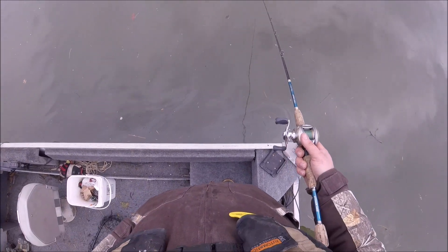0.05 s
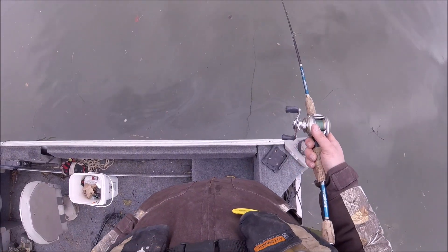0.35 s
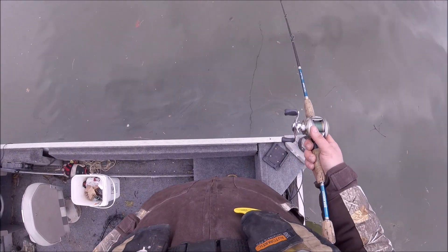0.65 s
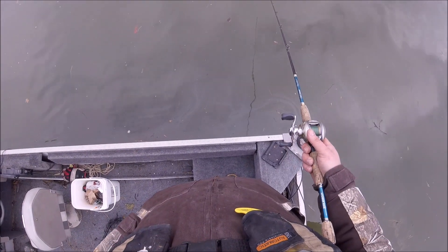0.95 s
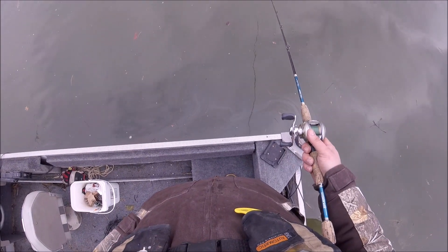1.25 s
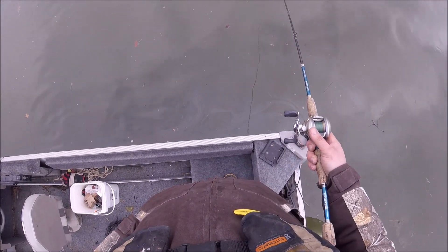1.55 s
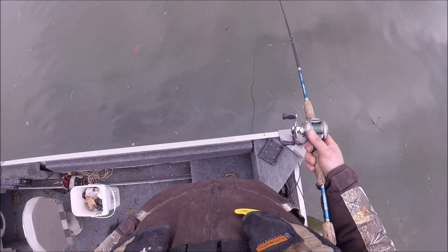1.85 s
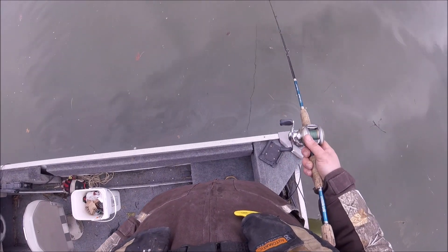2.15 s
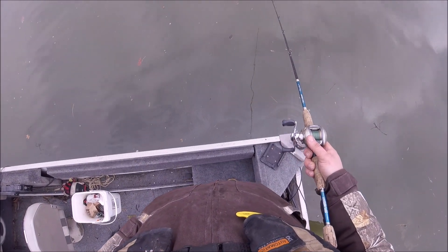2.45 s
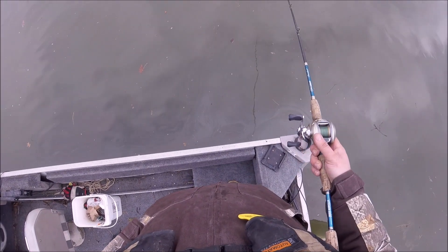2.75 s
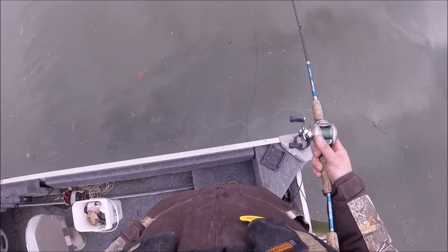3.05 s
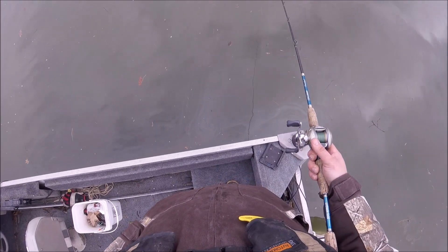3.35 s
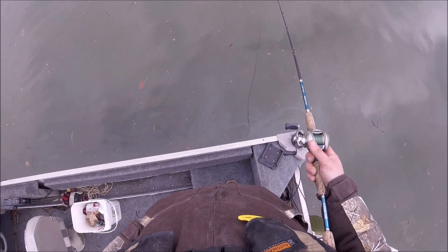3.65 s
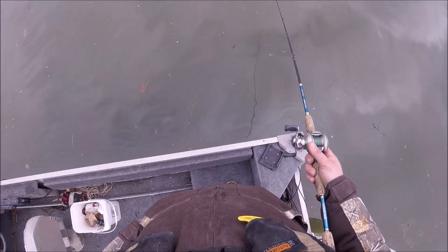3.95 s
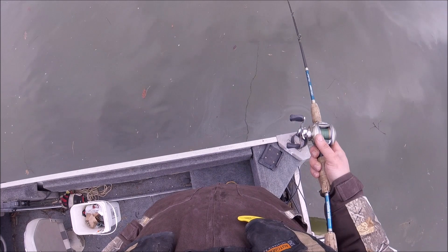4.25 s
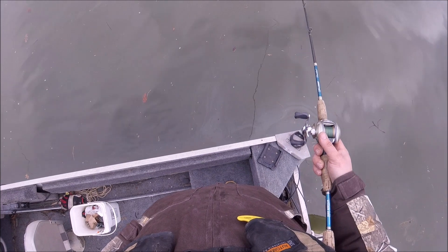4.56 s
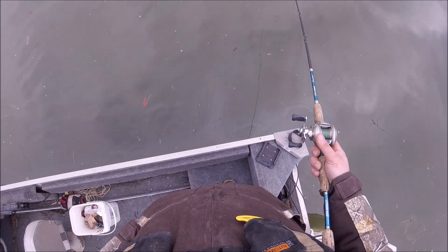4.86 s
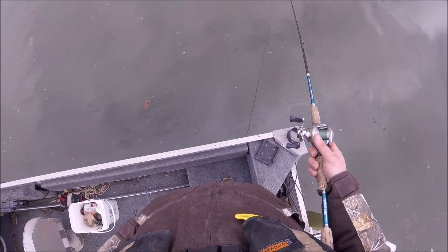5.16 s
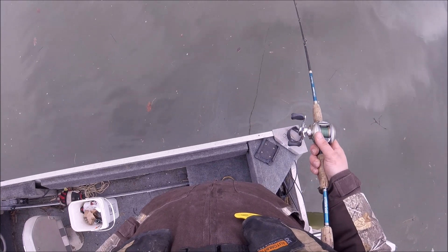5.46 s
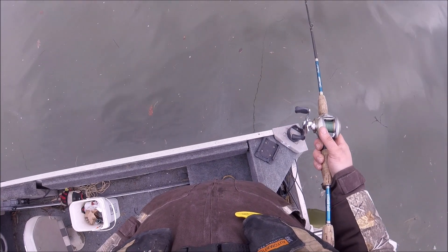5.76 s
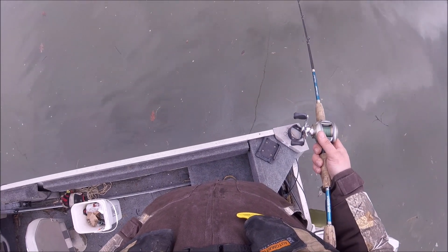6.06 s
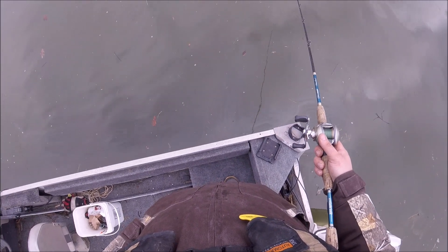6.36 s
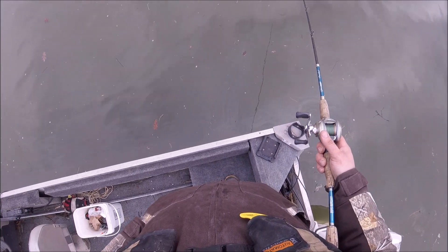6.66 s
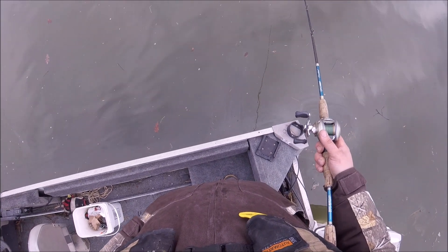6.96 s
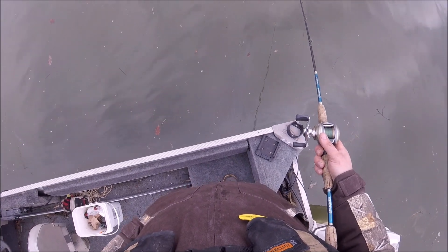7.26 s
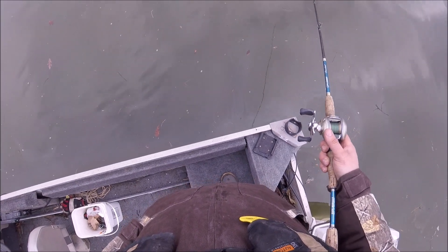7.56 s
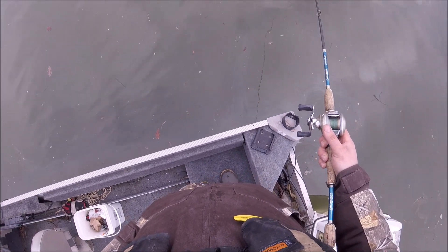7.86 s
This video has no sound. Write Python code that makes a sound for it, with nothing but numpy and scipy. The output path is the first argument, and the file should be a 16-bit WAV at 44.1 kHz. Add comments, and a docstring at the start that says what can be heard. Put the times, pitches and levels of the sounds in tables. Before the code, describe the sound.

An electric trolling motor hums with a soft throb while water washes faintly along a small metal boat.

```python
"""An electric trolling motor pushes a small aluminium boat along a calm river, heard from chest height.
All along, the hull hums on multiples of the shaft speed, which beat into a soft throb, while the
propeller churns and water washes along the side. At first a sleeve rustles and a breeze dies away.
After about a second a faint whine sings out, the fishing reel ticks and a hand scuffs the rod.
The hum swells near 3 seconds, a far bird calls near 4, and the sleeve rustles most at the end."""
import sys
import numpy as np
from scipy import signal
from scipy.fft import rfft, irfft, next_fast_len
from scipy.io import wavfile

SR = 44100
rng = np.random.default_rng(int(sys.argv[2]) if len(sys.argv) > 2 else 0)


def digitize_waveform(pressure):
    """Quantize a signal to 16-bit integers and store it at the path in sys.argv[1].

    Rows of a 2-D input are taken as channels; values are limited to [-1, 1].
    """
    field = np.atleast_2d(pressure).T
    bounded = np.clip(field, -1, 1)
    quanta = np.round(bounded * 32767).astype(np.int16)
    wavfile.write(sys.argv[1], SR, quanta)


N = 353064
TIME = np.arange(N) / SR

# The microphone's hiss. Each row: frequency in Hz, relative level in dB.
HISS_SPECTRUM = [(30, -2), (2500, -1), (3600, -6), (4350, -18), (5100, -5.5), (5900, -5.5), (6500, 4),
                 (8300, 3), (10000, 0), (11500, -6), (13000, -7), (15200, -13)]
# Air blowing on the microphone. Each row: frequency in Hz, relative level in dB.
BREEZE_SPECTRUM = [(10, 1), (25, -2), (52, -2), (70, 0), (95, -4), (130, 6), (300, -47)]
# Gusts of the breeze. Each row: time of the peak in seconds, length in seconds, level in dB.
GUSTS = [(.08, .3, -52), (.69, 0.17, -62), (1.36, .18, -57), (1.72, .17, -55), (2.32, .2, -64)]
# The bird's notes. Each row: start and length in seconds, first and last pitch in Hz, level in dB.
BIRD_NOTES = [(3.930, .065, 5520, 4950, -73), (3.968, .045, 5650, 4850, -75), (3.990, .06, 5650, 4900, -74)]
# Sleeve cloth. Each row: frequency in Hz, relative level in dB.
CLOTH_SPECTRUM = [(900, -15), (2200, 6.5), (3300, 2), (4300, -5), (5100, 2), (5800, -5), (6600, -4),
                  (9000, -15), (15000, -19)]
# Rubs of the sleeve. Each row: time of the peak in seconds, length in seconds, level in dB.
SLEEVE_RUBS = [(.05, 0.85, -71), (1.33, 0.77, -72.5), (2.45, 1, -78), (4.3, 0.77, -74), (7.55, 1.11, -73),
               (7.8, .75, -66), (7.92, 0.22, -64)]
# Skin on the rod's grip. Each row: frequency in Hz, relative level in dB.
GRIP_SPECTRUM = [(2000, -5), (4200, -7), (5200, 1), (6200, 1), (8500, -5), (10300, 0), (11800, -12),
                 (15000, -20)]
# The hand's scuff. Each row: time of the peak in seconds, length in seconds, level in dB.
HAND_SCUFFS = [(1.36, .036, -62.5)]
# The reel's tick. Each row: start in seconds, level in dB, pitch in Hz, seconds to fade by 60 dB.
REEL_TICKS = [(1.261, -52, 5620, .015)]
# Swells of the whine. Each row: time of the peak in seconds, length in seconds, level in dB.
WHINE_SWELLS = [(.86, 0.7, -55.5), (2.17, 0.15, -52.5)]
# Water along the hull. Each row: frequency in Hz, relative level in dB.
WASH_SPECTRUM = [(250, -15), (480, -5.5), (700, -3), (785, 0), (900, 0), (1020, -2.5), (1150, -3),
                 (1370, -7), (1600, -10.5), (2000, -17), (3000, -28), (4300, -40), (8000, -67)]
# How strong that water is. Each row: time in seconds, relative level in dB.
WASH_LEVELS = [(0, -49.5), (2.1, -49), (2.78, -48.5), (3.15, -50), (3.95, -48.5), (4.8, -50), (5.9, -49.5),
               (7, -50), (8, -49.5)]
# Three broad ringing tones of the metal. Each row: pitch in Hz, width in Hz, resting level in dB.
HULL_RINGS = [(810, 45, -63.5), (999.4, 67, -66.5), (1284, 97, -73)]
# The lowest ring bends in pitch. Each row: time in seconds, shift in Hz.
RING_BEND = [(.9, 0), (1.5, 15), (2.3, -0.5), (2.85, 15), (4.3, -10), (5.1, 58), (5.6, 46.5), (6.3, 0),
             (7.2, 35)]
# Surges of water. Each row: peak time and length in seconds, then low, middle and high ring in dB.
WATER_SURGES = [(.72, 0.4, -57, -67, -68), (1.5, 0.89, -58, -60, -74), (2.8, 0.69, -54.5, -50, -57.5),
                (3.36, 0.48, -70, -53, -75), (4.15, 0.44, -60, -57.5, -69), (5.22, 0.82, -58, -55, -80),
                (5.9, 0.65, -64, -58, -66), (6.4, 1.9, -68, -60.5, -76)]
# The propeller's churn. Each row: frequency in Hz, relative level in dB.
CHURN_SPECTRUM = [(100, -49), (120, -25.5), (143, -2.5), (175, -0.5), (215, -1), (258, -2), (278, -7),
                  (305, -7), (365, -12), (480, -17), (700, -27), (1500, -54)]
# How strong the churn is. Each row: time in seconds, level in dB.
CHURN_LEVELS = [(0, -43.5), (1.7, -44.5), (3, -41.5), (3.55, -46.2), (4.8, -44), (5.5, -44), (6.5, -44),
                (8, -43.5)]
# The motor's speed. Each row: time in seconds, shaft turns per second.
SHAFT_SPEED = [(0, 13.524), (2, 13.485), (8, 13.408)]
# The three tones the hull gives off best, changing as the boat swings.
# Each row: time in seconds, then levels in dB at 13, 15 and 16 times the shaft speed.
HUM_LEVELS = [(0, -37.5, -50, -40.7), (1.05, -37.3, -46, -40.8), (2.0, -37, -47.5, -42),
              (2.55, -36, -47.5, -40), (3.05, -33.5, -42.5, -38), (3.65, -36, -40, -38),
              (4.15, -36, -45.5, -42), (4.65, -39.3, -54, -55), (5.0, -38, -50.5, -45.5),
              (5.35, -36.5, -49.5, -49.5), (5.9, -35.5, -43.5, -53), (6.55, -36, -44.5, -45),
              (7.1, -37.3, -45.5, -45), (8, -36.5, -49, -46)]
# Weaker tones around those three. Each row: multiple of the shaft speed, relative level in dB.
WEAK_TONES = [(7, -77), (8, -74.5), (9, -66), (10, -69), (11, -54), (12, -53.5), (14, -76), (17, -50.5),
              (18, -63.5)]
# Higher, buzzing tones. Each row: multiple of the shaft speed, relative level in dB.
BUZZ_TONES = [(20, -59), (21, -60.5), (22, -61.5), (23, -66.5), (24, -60.5), (25, -64.5), (26, -65),
              (29, -79), (30, -68.5)]
# The buzz swells as the boat swings. Each row: time in seconds, change of level in dB.
BUZZ_SWELL = [(0, 0), (.6, -6), (1.05, 3), (1.9, -5), (2.6, 3), (3.2, 7.5), (3.7, 2), (4.5, -1.5),
              (6, -1.5), (8, 0.5)]


def gain_of(db):
    """Turns decibels into a number to multiply a sound by."""
    return 10 ** (np.asarray(db) / 20)


def evened(x):
    """Scales a signal so that its average power is 1."""
    return x / np.sqrt(np.mean(x ** 2) + 1e-20)


def curve(rows, column=1):
    """Joins the values in one column of a table with straight lines over time."""
    columns = np.transpose(rows)
    return np.interp(TIME, columns[0], columns[column])


def swells(rows, rest_db, column=2):
    """A loudness curve: smooth arches whose power adds to a resting level."""
    power = gain_of(rest_db) ** 2
    for row in rows:
        peak_s, length_s = row[:2]
        arch = np.cos(np.pi * np.clip((TIME - peak_s) / length_s, -.5, .5))
        power = power + (gain_of(row[column]) * arch) ** 2
    return np.sqrt(power)


def add(mix, start_s, sound):
    """Lays a sound into the mix at its start time."""
    part = mix[round(start_s * SR):][:len(sound)]
    part += sound[:len(part)]


def noise(shape):
    """Noise in which shape(hz) sets how strong each frequency is."""
    size = next_fast_len(N, True)
    hz = np.fft.rfftfreq(size, 1 / SR)
    spectrum = rfft(rng.standard_normal(size)) * shape(hz)
    return evened(irfft(spectrum, size)[:N])


def coloured(spectrum):
    """Noise whose tone colour follows a spectrum table."""
    points_hz, db = np.transpose(spectrum)
    return noise(lambda hz: gain_of(np.interp(np.log(hz + 1), np.log(points_hz), db)))


def ringing(centre_hz, width_hz):
    """Noise gathered around one pitch, which may move."""
    angle = 2 * np.pi * np.cumsum(centre_hz * np.ones(N)) / SR
    a, b = (noise(lambda hz: 1 / (1 + (hz / width_hz) ** 2)) for _ in range(2))
    return a * np.cos(angle) + b * np.sin(angle)


def drift(rate_hz):
    """A random wobble, about 1 in size, moving up to about the given rate."""
    return noise(lambda hz: np.exp(-(hz / rate_hz) ** 2))


def air(breeze_db=-48.5, fall_db_per_s=10, calm_db=-82, hiss_db=-64.87):
    """A breeze on the microphone fades with a few last gusts, over the microphone's even hiss."""
    fading = gain_of(breeze_db - fall_db_per_s * TIME)
    breeze = np.hypot(fading, swells(GUSTS, calm_db)) * coloured(BREEZE_SPECTRUM)
    return breeze + gain_of(hiss_db) * coloured(HISS_SPECTRUM)


def bird(waver_hz=140):
    """A far bird trills rough notes that fall and run into each other."""
    out = np.zeros(N)
    for start_s, length_s, first_hz, last_hz, db in BIRD_NOTES:
        n = round(length_s * SR)
        hz = np.linspace(first_hz, last_hz, n) + waver_hz * drift(300)[:n]
        tone = np.sqrt(2) * np.sin(2 * np.pi * np.cumsum(hz) / SR)
        add(out, start_s, gain_of(db) * np.hanning(n) * tone)
    return out


def sleeve(grain_db=2.1, weave_db=-8, weave_hz=4950, rise_hz=560):
    """Cloth slides unevenly as the angler turns; the weave sings higher the faster it slides."""
    speed = swells(SLEEVE_RUBS, rest_db=-92.5)
    pitch_hz = weave_hz + rise_hz * (speed / speed.max()) ** 2
    weave = gain_of(weave_db) * ringing(pitch_hz, width_hz=580)
    grain = gain_of(grain_db * drift(110))
    return speed * grain * (coloured(CLOTH_SPECTRUM) + weave)


def grip(grain_db=1):
    """The hand shifts on the rod in a short, bright, grainy scuff."""
    grain = gain_of(-grain_db * drift(400))
    return swells(HAND_SCUFFS, rest_db=-np.inf) * evened(grain * coloured(GRIP_SPECTRUM))


def reel(snap_gain=.55, snap_s=.0015):
    """A tiny snap rings one metal part of the reel."""
    out, t = np.zeros(N), TIME[:SR // 10]
    for start_s, db, hz, fade_s in REEL_TICKS:
        ring = np.sin(2 * np.pi * hz * t) * np.exp(-np.log(1000) * t / fade_s)
        snap = snap_gain * rng.standard_normal(len(t)) * np.exp(-t / snap_s)
        add(out, start_s, gain_of(db) * (ring + snap))
    return out


def whine(pitch_hz=781, waver_hz=6, flutter_db=3):
    """A faint, wavering tone sings out twice above the water."""
    angle = 2 * np.pi * np.cumsum(pitch_hz + waver_hz * drift(15)) / SR
    tone = evened(gain_of(flutter_db * drift(25)) * np.sin(angle))
    return swells(WHINE_SWELLS, rest_db=-75) * tone


def wash(offset_db=-1.5, lap_db=0.22):
    """Water slides along the side in small laps; its surges set the metal ringing."""
    out = gain_of(curve(WASH_LEVELS) + offset_db) * coloured(WASH_SPECTRUM)
    for k, (hz, width_hz, rest_db) in enumerate(HULL_RINGS):
        bend_hz = curve(RING_BEND) if k == 0 else 0
        out += swells(WATER_SURGES, rest_db, column=k + 2) * ringing(hz + bend_hz, width_hz)
    return out * gain_of(lap_db * drift(31))


def churn():
    """Swirling water from the propeller booms in the hull."""
    return gain_of(curve(CHURN_LEVELS)) * coloured(CHURN_SPECTRUM)


def motor(coupling=0.84, buzz_offset_db=-0.5, waver_db=1.5, sway_radians=0.41, wander_radians=0.24):
    """The hull hums on multiples of the shaft speed; close tones beat together into a soft throb."""
    shaft_angle = 2 * np.pi * np.cumsum(curve(SHAFT_SPEED)) / SR
    db_13, db_15, db_16 = (curve(HUM_LEVELS, column) for column in (1, 2, 3))
    out = np.zeros(N)
    for multiple, db, flutter_db in ((13, db_13, 0.57), (15, db_15, 1.6), (16, db_16, 1.6)):
        # The path through the hull shifts slowly, so the throb never keeps one pattern.
        phase = multiple * shaft_angle + 2 * np.pi * rng.random() + sway_radians * drift(1.5)
        out += gain_of(db + flutter_db * drift(9.5)) * np.cos(phase)
    # The weak tones rise and fall with two of their loud neighbours.
    loud_db = (db_13 + db_16) / 2
    weak_swell_db = coupling * (loud_db - np.mean(loud_db))
    buzz_swell_db = curve(BUZZ_SWELL) + buzz_offset_db
    for tones, swell_db in ((WEAK_TONES, weak_swell_db), (BUZZ_TONES, buzz_swell_db)):
        for multiple, db in tones:
            phase = multiple * shaft_angle + 2 * np.pi * rng.random() + wander_radians * drift(1.6)
            out += gain_of(db + swell_db + waver_db * drift(2.5)) * np.cos(phase)
    return np.sqrt(2) * out


def scene():
    """All the sounds meet at one microphone in the open air."""
    return (motor() + churn() + wash() + whine() + air() + sleeve() + grip() + reel() + bird())[None]


def record(dry):
    """The camera worn on the chest cuts off the very highest treble."""
    cutoff_hz = 15250
    low_pass = signal.firwin(1023, cutoff_hz, window=("kaiser", 9), fs=SR)
    return signal.oaconvolve(dry, low_pass[None], "same")


dry = scene()
out = record(dry)
digitize_waveform(out)
```